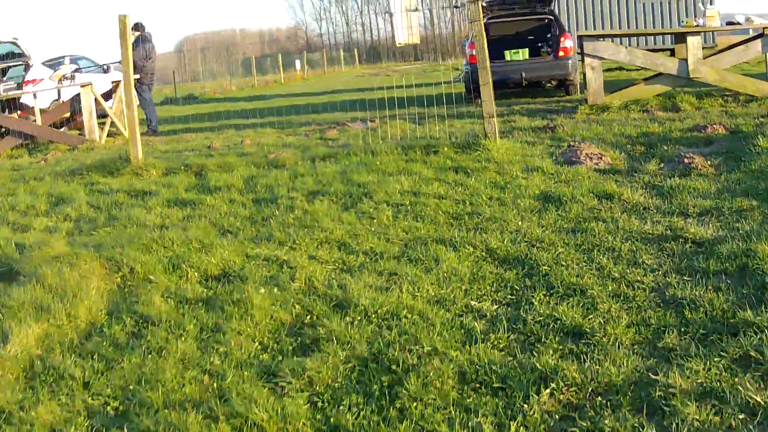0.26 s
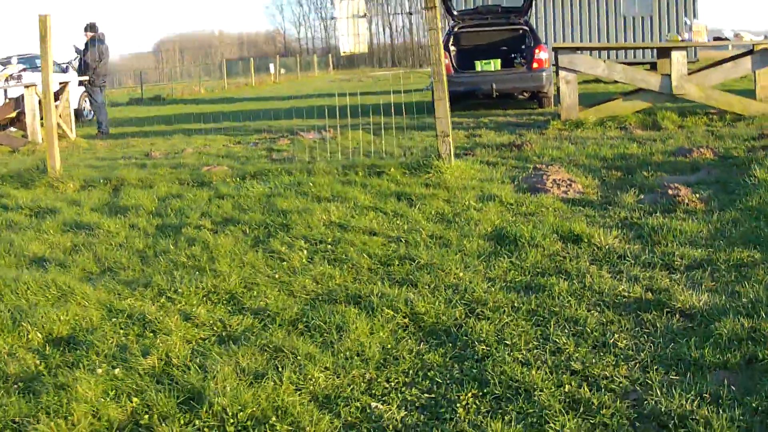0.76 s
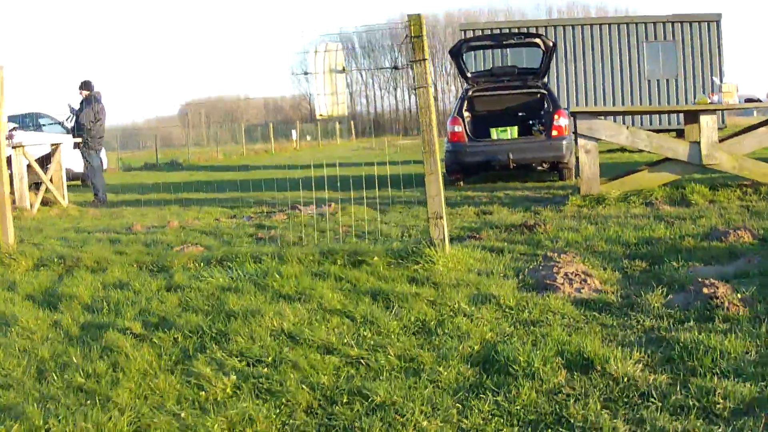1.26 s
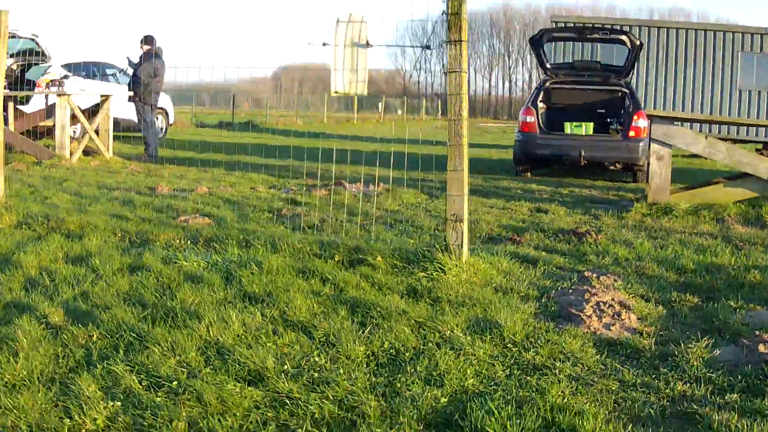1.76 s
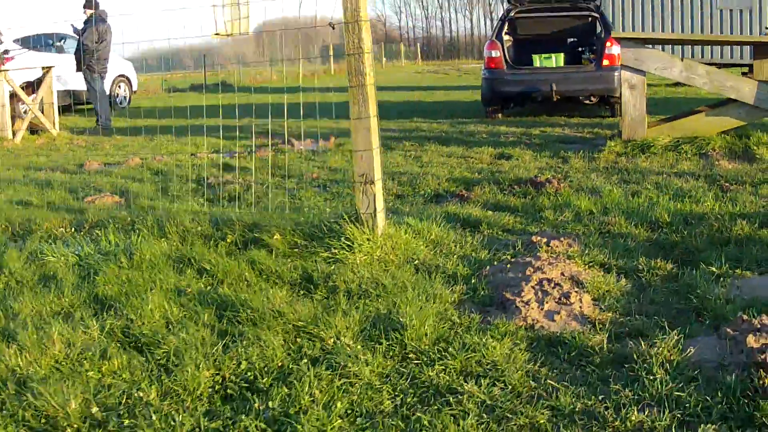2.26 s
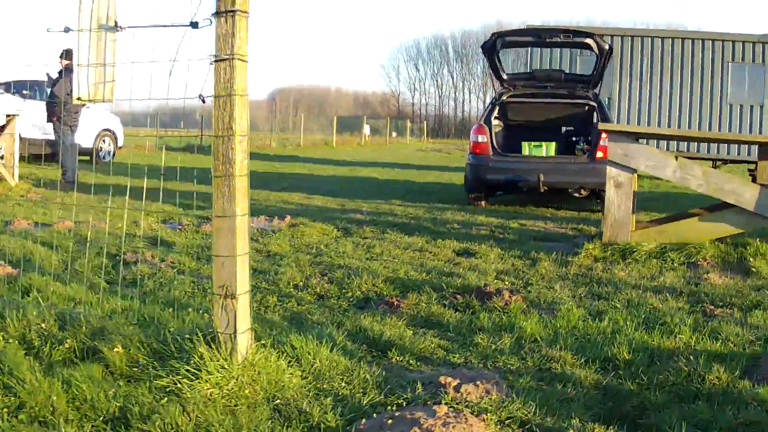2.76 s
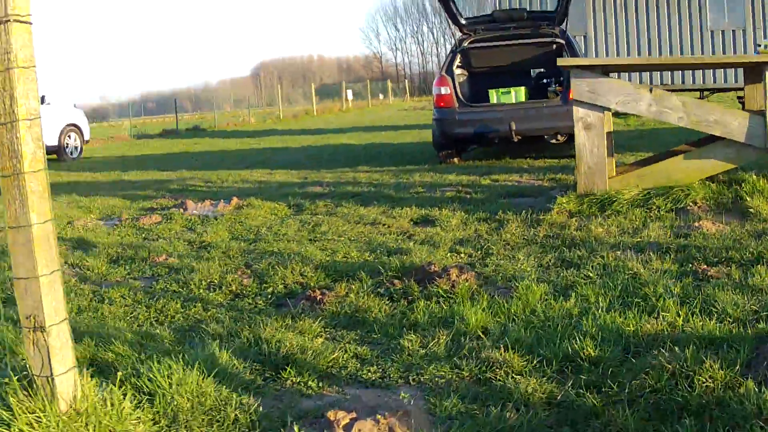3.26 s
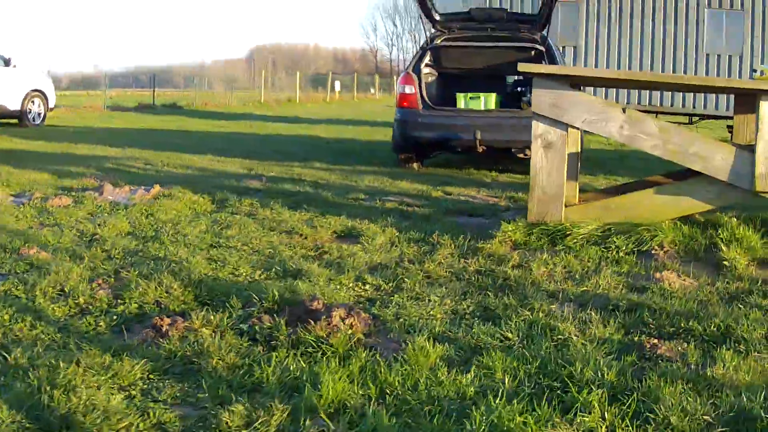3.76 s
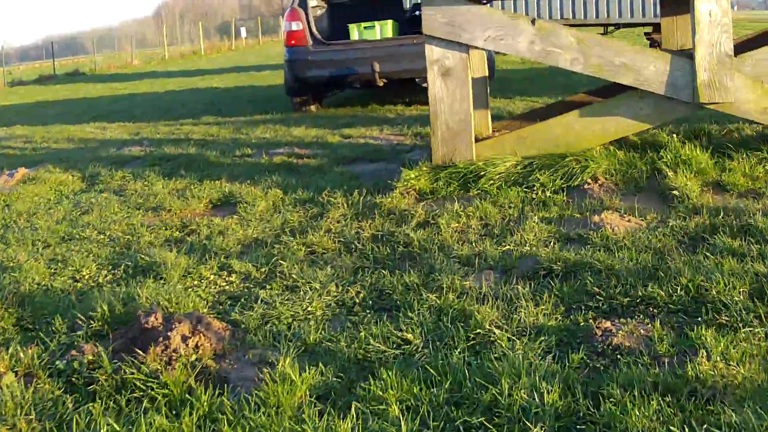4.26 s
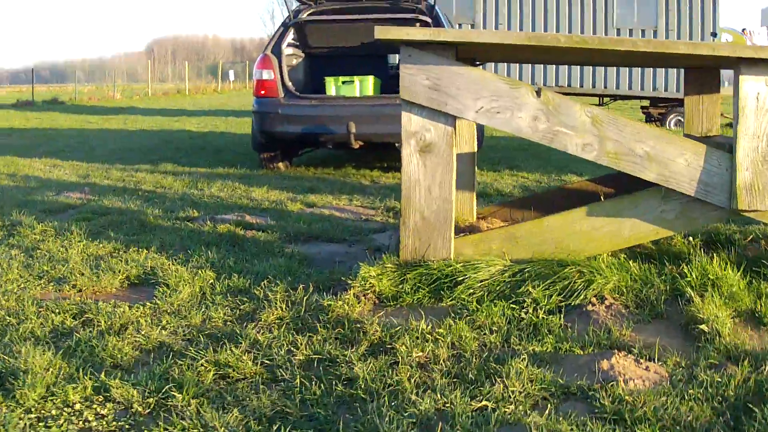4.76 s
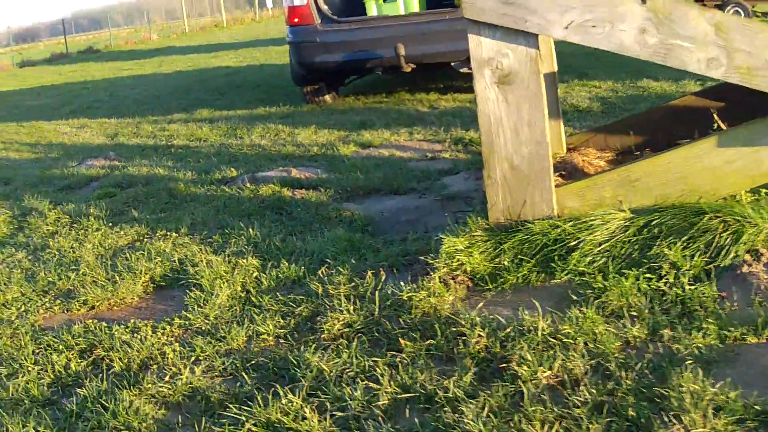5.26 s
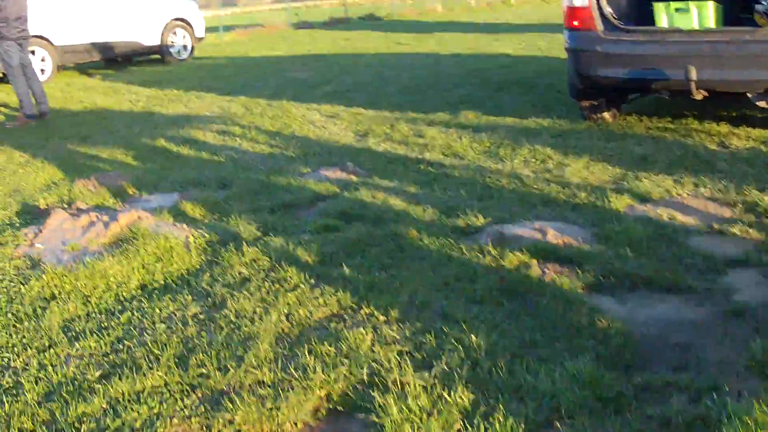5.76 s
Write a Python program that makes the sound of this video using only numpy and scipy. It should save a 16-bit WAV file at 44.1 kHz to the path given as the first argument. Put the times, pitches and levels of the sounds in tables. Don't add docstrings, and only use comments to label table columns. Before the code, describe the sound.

Nasal, buzzing whine of a small electric model helicopter, chopped by turbulence, over bassy wind thumps and a few loose ticks.

```python
import sys
import numpy as np
from scipy import signal
from scipy.fft import rfft, irfft
from scipy.io import wavfile
from scipy.ndimage import uniform_filter1d

SR = 44100
rng = np.random.default_rng(int(sys.argv[2]) if len(sys.argv) > 2 else 0)


def pcm_store(signal):
    levels = np.round(np.clip(np.atleast_2d(signal), -1, 1) * 32767)
    wavfile.write(sys.argv[1], SR, levels.astype(np.int16).T)


N = 264600

# time in seconds, peak in dB, pitch in Hz, length in ms.
GUSTS = [(0.186, -20.5, 88, 13), (0.216, -23, 67, 26), (0.256, -25, 63, 19), (0.372, -23, 85, 18.5),
         (0.814, -19.5, 86, 20), (1.002, -19, 90, 15.6), (1.214, -15.5, 80, 42), (1.371, -19, 80, 17),
         (1.42, -28, 88.4, 18), (1.53, -17.5, 72.6, 18), (2.29, -24, 86.7, 28), (2.614, -22, 83, 20),
         (2.811, -32.5, 92, 35), (2.919, -21, 81.2, 38), (3.357, -21.5, 89.5, 59), (3.669, -25, 92, 19),
         (3.975, -17, 91, 22), (4.032, -22.5, 61, 30), (4.405, -17.5, 84, 22), (4.451, -25, 76, 55),
         (4.714, -9.5, 78, 17.6), (4.921, -27.5, 70.5, 24), (5.035, -20.5, 87, 22), (5.076, -23, 72.6, 8.4),
         (5.328, -19.5, 75, 20), (5.402, -23, 80, 37), (5.522, -23.5, 82.6, 80), (5.621, -19.5, 72, 35),
         (5.735, -19, 80, 36), (5.878, -20, 79, 24)]


def gain_of(db):
    return 10 ** (np.asarray(db) / 20)


def bell(x):
    return np.exp(-.5 * x ** 2)


def evened(x):
    return x / np.sqrt(np.mean(abs(x) ** 2) + 1e-20)


def curves(rows):
    s, *columns = np.transpose(rows)
    return [np.interp(np.arange(N) / SR, s, c) for c in columns]


def coloured(points):
    f, db = np.transpose(points)
    hz = np.fft.rfftfreq(N, 1 / SR)
    shape_db = np.interp(np.log(hz + 1), np.log(f + 1), db, left=-120, right=-120)
    return evened(irfft(rfft(rng.standard_normal(N)) * gain_of(shape_db), N))


def white():
    return rng.standard_normal(N) + 1j * rng.standard_normal(N)


def smoothed(x, width_hz):
    r = np.exp(-np.pi * width_hz / SR)
    return evened(signal.lfilter([1], np.convolve([1, -r], [1, -r]), x))


def filtered(x, order, hz, kind):
    return signal.sosfilt(signal.butter(order, hz, kind, fs=SR, output="sos"), x)


def swells(times, levels_db, rise_s, tail_s):
    t = np.arange(N) / SR
    humps = 0
    for s, db in zip(times, levels_db):
        humps = humps + gain_of(db) * bell((t - s) / np.where(t < s, rise_s, tail_s))
    return humps


def circuit():
    return gain_of(-77) * coloured([(500, -34), (3000, -30), (4600, -11), (5300, 14), (5900, 9.5)])


def wash():
    # frequency in Hz, level in dB per Hz.
    wind_colour = [(25, -2), (42, 7), (91, 9.5), (179, -16), (225, -22.5), (280, -36), (340, -31.5),
                   (553, -39), (679, -46.5), (792, -39), (900, -40.5), (1170, -38.5), (1980, -120)]
    # time in seconds, wind strength in dB.
    wind_strength = [(0.0, -48), (0.27, -44.5), (0.58, -50.5), (0.87, -41.5), (1.2, -44), (2.04, -47),
                     (3.61, -47), (4.24, -45.5), (4.56, -42), (5.25, -45.5), (5.52, -36.5), (6.0, -43)]
    # time in seconds, level in dB.
    flap_bursts = [(0.0, -55.5), (.12, -58), (0.282, -48.5), (.33, -51), (.45, -55.5), (0.578, -56),
                   (.77, -48), (.83, -57), (1.0, -56), (1.23, -45), (1.38, -54), (1.45, -54), (1.6, -58.5),
                   (1.87, -48.5), (2.08, -56), (2.17, -60), (2.54, -45.5), (2.638, -47.5), (2.83, -58),
                   (2.918, -55.5), (3.07, -56), (3.202, -65), (3.37, -49), (3.476, -53), (3.57, -56),
                   (3.65, -56), (3.736, -55), (3.86, -53.5), (3.99, -54.5), (4.42, -57), (4.68, -48),
                   (4.905, -51), (5.031, -44), (5.15, -52), (5.31, -49), (5.4, -59), (5.56, -58),
                   (5.73, -45.5), (5.81, -49.5), (5.884, -45), (5.99, -43)]
    flap_s, flap_hiss_db = 0.023, -21.5
    last_gust_s, last_gust_db = 5.87, 9.5

    wind_db = curves(wind_strength)[0]
    change_db = wind_db - wind_db.mean()
    gust_s, gust_db = np.transpose(GUSTS)[:2]
    stirred = gain_of(-20) * swells(gust_s, gust_db, 0.01, 0.04)
    flaps = swells(*np.transpose(flap_bursts), flap_s, flap_s)
    freshening_db = last_gust_db * np.clip((np.arange(N) / SR - last_gust_s) / 0.075, 0, 1)
    rumble_level = gain_of(wind_db + 2.5) + stirred
    flap_level = gain_of(-60 + 0.33 * change_db) + flaps
    hiss_level = gain_of(-67 + 0.29 * change_db + freshening_db) + gain_of(flap_hiss_db) * flaps

    wind = coloured(wind_colour)
    low = evened(filtered(wind, 4, 160, "low"))
    middle = evened(filtered(wind, 3, [160, 290], "band"))
    high = evened(filtered(wind, 4, 290, "high"))
    lumps, flicker = smoothed(white(), 32).real, smoothed(white(), 63).real
    rumble = rumble_level * gain_of(2.5 * lumps - 1.0) * low
    flapping = flap_level * gain_of(6.2 * np.tanh(0.7 * lumps + 0.38 * flicker)) * middle
    hiss = hiss_level * gain_of(4.5 + 0.5 * lumps + 3.4 * flicker) * high
    return rumble + flapping + hiss


def gusts():
    # time in seconds, peak in dB.
    puffs = [(0.087, -29.5), (0.711, -30.5), (0.84, -26), (1.15, -32), (1.27, -28.5), (1.588, -28.5),
             (1.739, -33), (1.865, -33), (3.404, -27), (4.242, -42), (4.43, -32), (4.519, -31.5),
             (4.63, -25), (4.686, -24.5), (4.759, -25), (4.797, -26), (4.985, -27), (5.149, -37),
             (5.28, -25.5), (5.454, -23.5), (5.555, -32), (5.764, -27.5), (5.819, -32), (5.99, -32),
             (1.09, -36), (2.385, -36), (2.477, -32), (3.09, -47), (3.276, -39), (3.751, -33), (4.285, -30),
             (4.576, -33), (5.232, -32), (3.437, -28.5)]
    puff_hz, puff_ms = 80, 28
    # time in seconds, peak in dB.
    heaves = [(.54, -35.5), (1.251, -24), (2.103, -43), (2.579, -28.5), (3.25, -32), (3.344, -29),
              (3.584, -30), (3.735, -38), (4.234, -33), (4.747, -21), (4.947, -27), (5.333, -30),
              (3.70, -33), (4.089, -31), (3.47, -44)]
    heave_hz, heave_ms = 51.3, 32

    out, t = np.zeros(N), np.arange(N) / SR
    rows = list(GUSTS)
    rows += [(s, db, puff_hz, puff_ms) for s, db in puffs]
    rows += [(s, db, heave_hz, heave_ms) for s, db in heaves]
    for (s, db, hz, ms), (phase, front_phase) in zip(rows, rng.random((len(rows), 2))):
        near = slice(max(round((s - .12) * SR), 0), round((s + .12) * SR))
        u = t[near] - s
        width_s = ms * 0.00034 * np.where(u < 0, 0.92, 0.89)
        swing = bell(u / width_s) * np.cos(2 * np.pi * (hz * u + phase))
        front = bell((u + 0.0012) / 0.0031) * np.cos(2 * np.pi * (1.68 * hz * u + front_phase))
        out[near] += gain_of(db) * (swing + gain_of(-24.0) * front)
    fading = bell(t / 0.0071) * np.cos(2 * np.pi * 80 * t)
    return out - gain_of(-30.5) * fading


def slaps():
    # time in seconds, peak in dB.
    slap_times = [(0.41, -34), (0.577, -58), (0.734, -31), (0.991, -28), (1.093, -34), (1.217, -39),
                  (2.046, -44), (2.268, -34), (3.356, -42), (3.747, -34), (4.612, -30), (4.674, -22),
                  (5.02, -41), (5.314, -32), (5.595, -30), (5.722, -28), (5.797, -25.5), (5.957, -21),
                  (5.806, -21), (5.86, -28), (5.968, -29), (1.55, -41), (2.66, -44), (5.42, -51),
                  (0.215, -44), (.359, -30), (1.276, -29), (3.513, -44), (4.815, -34), (5.375, -45),
                  (1.34, -32), (4.318, -42), (4.431, -41), (4.764, -38), (5.845, -24), (5.894, -39)]
    slap_hz = 383
    out, u = np.zeros(N), np.arange(1200) / SR
    for (s, db), phase in zip(slap_times, rng.random(len(slap_times))):
        decay = gain_of(db + 2.5 - 60 * u / 0.0085)
        onset = np.minimum(u / 0.0038, 1)
        ring = decay * onset * np.sin(2 * np.pi * (slap_hz * u * (1 - 8 * u) + phase))
        part = out[round(s * SR):][:len(u)]
        part += ring[:len(part)]
    return out


def ticks():
    # time in seconds, peak in dB, decay in ms, colour in Hz.
    loose_ticks = [(1.0751, -31.5, 20, 2900), (1.079, -39, 16, 3600), (1.19, -41, 6.0, 4000),
                   (1.208, -44, 8, 5300), (1.228, -44, 8.0, 4800), (3.823, -48, 50, 5700),
                   (1.075, -32, 33, 2500), (.811, -52, 10, 4500), (.911, -50, 9.2, 5300),
                   (2.058, -50, 10, 5400), (4.495, -50, 12, 4500), (5.961, -54, 30.0, 1930)]
    # time in seconds, peak in dB, pitch in Hz.
    squeaks = [
        (3.823, -56, 5000),
        (3.832, -57, 5050),
        (3.85, -60.5, 5000),
    ]
    squeak_s, glide_hz_per_s = 0.0023, 40000
    t, out = np.arange(N) / SR, 0
    for s, db, ms, hz in loose_ticks:
        burst = (t > s) * gain_of(db - 60 * np.maximum(t - s, 0) / (ms * 0.00027))
        out = out + burst * coloured([(0.14 * hz, -14), (hz, 0), (2.0 * hz, -6)])
    for s, db, hz in squeaks:
        u = t - s
        tone = np.cos(2 * np.pi * u * (hz + .5 * glide_hz_per_s * u))
        out = out + gain_of(db) * bell(u / squeak_s) * tone
    return out


def roughness(calm):
    # start in seconds, length in seconds, turbulence from 0 to 1.
    spells = [(0.138, 0.18, 0.6), (0.513, 0.059, 0.95), (0.688, 0.27, 0.83), (1.023, 0.097, 0.28),
              (1.31, 0.074, 0.6), (1.512, 0.59, 1), (2.203, 0.25, 0.42), (2.527, 0.17, 0.84),
              (2.76, 0.57, 0.93), (3.162, 0.12, 0.57), (3.493, 0.31, 0.63), (3.745, 0.2, 0.97),
              (4.16, 0.19, 0.5), (4.602, 0.49, 1), (5.29, 0.65, 1)]
    edge_s = 0.045
    t = np.arange(N) / SR
    for s, length, rough in spells:
        inside = np.clip(np.minimum(t - s, s + length - t) / edge_s + .5, 0, 1)
        calm = calm + inside * (rough - calm)
    return np.clip(calm, 0, 1)


def shaft():
    # time in seconds, sag in Hz, fall in seconds, recovery in seconds.
    sags = [(0.1, 7.7, 0.2, 0.13), (0.37, 7.1, 0.2, 0.23), (0.79, 5.7, 0.19, 0.16), (1.0, 5.0, 0.38, 0.1),
            (1.14, 7.7, 0.09, 0.13), (1.42, 7.0, 0.14, 0.16), (1.6, 4.2, 0.12, 0.26),
            (1.88, 5.1, 0.12, 0.16), (2.18, 6.3, 0.22, 0.17), (2.5, 6.4, 0.25, 0.17),
            (2.84, 6.0, 0.18, 0.06), (3.22, 6.2, 0.35, 0.24), (3.59, 6.0, 0.16, 0.14),
            (3.84, 7.2, 0.1, 0.06), (3.99, 5.9, 0.11, 0.15), (4.27, 6.4, 0.34, 0.19),
            (4.59, 6.6, 0.16, 0.16), (4.87, 5.1, 0.2, 0.25), (5.24, 4.6, 0.3, 0.22), (5.65, 8.3, 0.2, 0.14),
            (5.86, 6.9, 0.12, 0.5)]
    free_hz, smooth_s = 339, .03
    t = np.arange(N) / SR
    ramps = [np.interp(t, [s - fall, s, s + back], [0, hz, 0]) for s, hz, fall, back in sags]
    return uniform_filter1d(free_hz - np.max(ramps, axis=0), size=round(smooth_s * SR))


def clumps(x, depth_db):
    _, t, z = signal.stft(x, SR, nperseg=256)
    field = rng.standard_normal(z.shape[::-1]).T
    field = uniform_filter1d(field, size=5, axis=0)
    field = evened(uniform_filter1d(field, size=3, axis=1))
    field = 2 * np.tanh(field / 1.6)
    depth_db = np.interp(t, np.arange(N) / SR, depth_db)
    patches = gain_of(depth_db * field - 0.12 * depth_db ** 2)
    return signal.istft(z * patches, SR, nperseg=256)[1][:N]


def port(turbulence):
    # time in seconds, depth in dB, length in ms.
    drops = [(0.548, 5.5, 3.8), (0.732, 1.5, 23), (1.616, 2.5, 12), (1.677, 13, 3.7), (1.72, 18, 4.2),
             (1.769, 3.5, 27), (1.793, 13, 3.7), (1.973, 7, 4.6), (2.811, 5, 14), (2.938, 12, 5.8),
             (2.995, 19, 2.9), (3.016, 8.5, 10), (3.134, 29, 4.7), (4.662, 25, 2.5), (4.729, 18, 1.5),
             (4.757, 14, 3.8), (4.827, 8, 3.4), (4.944, 4.5, 6.1), (5.016, 3.5, 5.3), (5.109, 7, 3.5),
             (5.322, 10, 2.6), (5.367, 5.5, 4), (5.433, 11, 3.2), (5.487, 5, 4.5), (5.501, 10, 4.2),
             (5.59, 12, 6.3), (5.643, 19, 3.6), (5.824, 9, 5.3), (5.845, 5, 6), (5.884, 3.5, 6),
             (1.582, 4, 4), (1.742, 3, 6), (1.903, 1.5, 7), (1.948, 5, 3.9), (2.042, 2, 4.2),
             (2.144, 1, 4.4), (4.684, 3, 4), (4.741, 5, 3), (4.792, 4, 2.5), (5.08, 3.5, 7),
             (5.242, 4.5, 4.6), (5.343, 4, 3.4), (5.412, 3, 5), (5.702, 3, 4.2), (5.734, 0.5, 9)]
    # time in seconds, boost in dB.
    bursts = [(0.238, 5), (0.367, 6.5), (0.435, 3), (0.788, 7), (0.874, 6), (1.224, 4), (1.356, -2),
              (1.441, 8.5), (1.596, 8.5), (1.631, 5.5), (1.653, 0), (1.689, 2), (1.778, 3), (1.799, 10),
              (1.838, 8), (1.889, 4), (2.052, 4), (2.107, 6), (2.134, 5), (2.159, 3), (2.276, 6),
              (2.467, 3.5), (2.507, 5.5), (2.673, 6.5), (2.877, 7), (2.908, 5), (4.831, 2.5), (3.034, 1),
              (3.171, 1.5), (3.349, 2.8), (3.762, 3.1), (4.018, 2), (4.254, 3.5), (4.441, 3), (4.643, 3),
              (4.716, 6), (4.775, 1), (4.845, 7), (4.875, 6), (4.954, 7), (5.028, 5), (5.049, 5.5),
              (5.07, 6), (5.166, 6), (5.197, 4), (5.3, 6), (5.513, 5.5), (5.542, 0), (5.573, 4.5),
              (5.671, 7), (5.711, 4), (5.741, 2.6), (1.475, 5.5), (2.554, 2), (2.731, 3), (3.069, 2.5),
              (5.853, 8.5), (5.87, -1), (5.938, 6), (5.964, 6.5)]
    # time in seconds, loss in dB.
    lulls = [(0.048, 11.5), (0.259, 3.1), (0.327, 4.5), (0.514, 4.5), (0.69, 13), (0.906, 13), (0.948, 12),
             (0.984, 4), (1.296, 8), (1.376, 9), (1.486, 6), (1.525, 6), (1.576, 2), (1.905, 1), (1.639, 7),
             (2.096, 5), (2.771, 3), (3.089, 7), (5.627, 7), (5.807, 6), (2.543, 1), (2.12, 7), (2.338, 5),
             (2.446, 4), (2.544, -1), (2.585, 7), (2.619, 4), (2.84, 1), (3.19, 7), (3.285, 5), (3.548, 7),
             (3.622, 8), (3.72, 4), (3.743, 4), (3.874, 3), (4.031, 2), (4.107, 10), (4.362, 4),
             (4.528, 14), (4.68, 3), (4.79, 4.5), (4.858, 3.0), (4.891, 4), (5.727, 8.5), (5.79, 5),
             (5.904, 3)]
    burst_s, lull_s = 0.0029, 0.0031
    rotor_hz = 30.9

    t = np.arange(N) / SR
    throb = ((1.5 + 0.57 * smoothed(white(), 29.0)) * np.exp(2j * np.pi * rotor_hz * t)).real
    flutter = smoothed(white(), 170).real
    flutter = evened(flutter - uniform_filter1d(flutter, size=2500))
    gain_db = (1.1 + 0.82 * turbulence) * throb + (0.24 + 0.87 * turbulence) * flutter
    gain = gain_of(1.6 * np.tanh(gain_db / 17.0))
    gain /= np.sqrt(uniform_filter1d(gain ** 2, size=8000))

    shut_db = sum(db * bell((t - s) / (ms * np.where(t < s, 7.5e-4, 2.5e-4))) for s, db, ms in drops)
    eddy_db = sum(db * bell((t - s) / (burst_s * np.where(t < s, .45, 1.5))) for s, db in bursts)
    eddy_db -= sum(db * bell((t - s) / lull_s) for s, db in lulls)
    beat_db = 0.56 * turbulence ** 2 * np.cos(2 * np.pi * (rotor_hz * t + 0.56))
    return gain * gain_of(0.82 * eddy_db - 2.24 * shut_db + beat_db)


def motor():
    # time in seconds, whine level in dB, turbulence of the calmer air from 0 to 1.
    whine_course = [(0.0, -43, 0.43), (0.1, -43, 0.74), (0.67, -44, 0.61), (1.44, -41.5, 0.76),
                    (1.54, -47.5, 0.5), (1.65, -47, 0.5), (1.74, -47.5, 0.84), (2.31, -43.5, 0.6),
                    (3.09, -45.5, 0.56), (3.23, -43, 0.68), (3.81, -43.5, 0.76), (4.61, -43.5, 0.67),
                    (4.68, -45.5, 0.7), (5.13, -44, 0.8), (5.45, -45, 0.63), (5.58, -39, 0.5),
                    (5.6, -46.5, 0.7), (6.0, -48.5, 0.88)]
    # shaft order, clean line in dB, blurred skirt in dB, skirt width in Hz.
    orders = [(1, -28, -20, 120), (2, -23, -22.5, 98), (3, -17.5, -13, 71), (4, 1.5, -14.5, 130),
              (5, 0.5, -0.5, 180), (6, -10, -0.5, 208), (7, -3, -8.5, 156), (8, -10.5, -13, 136),
              (9, -16, -9.5, 69), (10, -24, -8, 125), (11, -15, -10.5, 170), (12, -19.5, -17.5, 110),
              (13, -38, -23.5, 69), (14, -32, -28, 120), (15, -41, -45, 75), (16, -34, -25, 94)]
    # frequency in Hz, level in dB per Hz.
    rush_colour = [(410, -40), (700, -47), (1000, -6), (1180, -7), (1330, 15.5), (1520, -1), (1690, -13),
                   (2400, 2), (3200, -16), (3630, -9.5), (6000, -22), (7800, -68), (13200, -120)]
    # time in seconds, boost in dB, width in seconds.
    surges = [(.22, 1.5, 0.032), (.63, 1.5, 0.026), (.85, 1.5, 0.015), (1.36, 1.5, 0.012),
              (1.44, -1.5, 0.016), (1.65, 4, 0.07), (1.83, 0, 0.035), (2.29, 2, 0.013), (3.36, 1.5, 0.026),
              (4.45, 2, 0.024), (4.57, 1.5, 0.12), (5.0, 1, 0.031), (5.55, -3, 0.063), (5.7, 0.5, 0.033),
              (5.96, 5, 0.12), (1.728, 2.5, .005), (2.075, 2, 0.0047), (2.636, 1.5, 0.0071),
              (2.802, 9, 0.0054), (3.815, 0, 0.0045), (4.669, 1, .006)]
    # time in seconds, change in dB.
    tilts = [(0.02, -11), (0.135, -9), (0.238, -17), (0.293, -6), (0.359, -6), (0.44, -3.3), (0.529, 5),
             (0.609, 2), (0.952, 6.5), (1.044, -20), (1.122, -9.0), (1.174, -12), (1.351, -4), (1.402, -11),
             (1.528, 3), (1.62, -9), (1.869, 7.5), (2.027, 4.5), (2.177, 9), (2.269, -12), (2.332, -0.5),
             (2.417, -4), (2.465, -11), (2.514, 1), (2.59, 8.5), (2.717, 5.5), (2.801, -4), (2.935, 7),
             (3.059, 1), (3.209, -3), (3.288, 2), (3.324, 4.5), (3.366, -8), (3.514, -2), (3.625, 4),
             (3.71, 3.5), (3.777, 3.5), (3.858, -13), (4.122, 7), (4.248, -5.7), (4.342, -7), (4.454, -12),
             (4.516, 2), (4.563, -13), (4.689, 6.5), (4.791, 3), (4.864, 4), (5.006, 5), (5.105, 7.5),
             (5.217, 7), (5.257, 9.5), (5.417, 7.5), (5.506, -3), (5.573, -5), (5.632, 14), (5.701, 9)]
    tilt_s = 0.012
    spread = .72
    mesh_hz, mesh_depth, mesh_order = 52.33, 0.08, 5.1
    path_jitter = 0.15
    turn_s, turn_order, turn_width, turn_boost_db = 5.37, 7.2, 1.6, 5.5

    t = np.arange(N) / SR
    level_db, calmer = curves(whine_course)
    turbulence, hz = roughness(calmer), shaft()
    turns = 2 * np.pi * np.cumsum(hz) / SR
    level_db = level_db + sum(db * bell((t - s) / width) for s, db, width in surges)
    bright_db = 1.5 - 5.5 * turbulence + 0.5 * smoothed(white(), 5.0).real
    bright_db = bright_db + sum(db * bell((t - s) / tilt_s) for s, db in tilts)
    mesh = ((1.0 + 2.5 * smoothed(white(), 25.0)) * np.exp(2j * np.pi * mesh_hz * t)).real
    load_db = .5 * (hz.mean() - hz)
    turning = np.clip((t - turn_s) / 0.38, 0, 1)

    shared, lines, skirts = white(), 0, 0
    slipping = turns + path_jitter * turbulence ** 3 * smoothed(shared, 35).real
    for k, line_db, skirt_db, width_hz in orders:
        k = round(k)
        order = np.exp(1j * (k * slipping - spread * k * k))
        fading_db = 0.029 * k * smoothed(white(), 49).real
        mesh_share = mesh_depth * np.exp(-((k - mesh_order) / 1.9) ** 2)
        wobble = 1 + 0.076 * smoothed(white(), 45) + mesh_share * mesh
        turn_db = turn_boost_db * turning * (np.exp(-((k - turn_order) / turn_width) ** 2) - .3)
        lines = lines + gain_of(line_db + turn_db + .45 * fading_db) * (wobble * order).real
        eddy = smoothed(0.4 * shared + 0.87 * white(), width_hz)
        skirts = skirts + gain_of(skirt_db + turn_db + fading_db) * (eddy * order).real

    rush = gain_of(-1.5) * coloured(rush_colour) * (1 + 0.33 * np.cos(turns))
    calm = np.sqrt(1 - 0.91 * turbulence) * gain_of(3.5 + load_db) * lines
    blurred = (0.24 + 0.74 * turbulence) * clumps(skirts + rush, 0.81 + 1.84 * turbulence)
    whine = calm + blurred
    upper_band = signal.butter(3, [3150, 4400], "band", fs=SR, output="sos")
    upper = signal.sosfiltfilt(upper_band, whine)
    whine = whine + (gain_of(bright_db + 0.92 * smoothed(white(), 35).real) - 1) * upper
    return gain_of(level_db - 2.0) * whine * port(turbulence)


def scene():
    # frequency in Hz, width in Hz, gain in dB.
    housing = [(174.5, 14.6, -4), (219.6, 22.6, 6.5), (1277, 70, -6), (1492, 42, -3), (2124, 48, -7),
               (2508, 17, 6), (3010, 110, -2), (3270, 61, -6), (3543, 66, 4.5), (4050, 47, 6),
               (4580, 69, -3)]
    air = circuit() + wash() + gusts() + slaps() + ticks() + motor()
    air = np.pad(air, SR, "reflect", reflect_type="odd")
    hz = np.fft.rfftfreq(len(air), 1 / SR)
    housing_db = sum(db * bell((hz - f) / width) for f, width, db in housing)
    return irfft(rfft(air) * gain_of(housing_db), len(air))[None, SR:-SR]


def band_limit(x):
    return signal.sosfilt(signal.butter(12, 15280, fs=SR, output="sos"), x)


def record(dry):
    cut = filtered(dry, 4, 35, "high")
    coarse = signal.resample_poly(cut, 40, 147, axis=1)
    held = np.repeat(coarse, 4, axis=1)
    back = signal.resample_poly(held, 147, 160, axis=1)[:, :N]
    return band_limit(back)


dry = scene()
out = record(dry)
pcm_store(out)
```